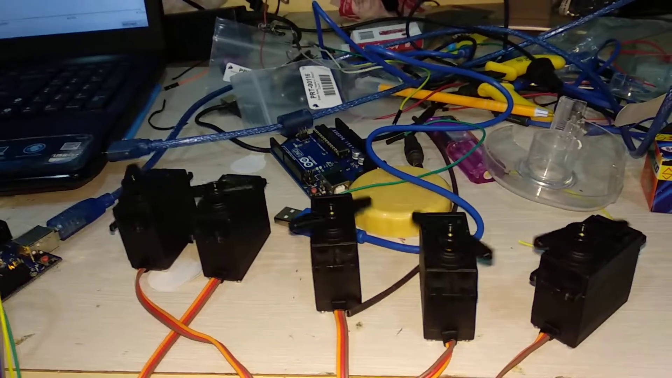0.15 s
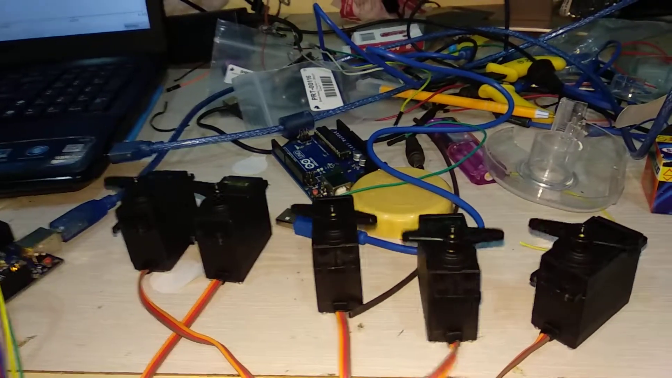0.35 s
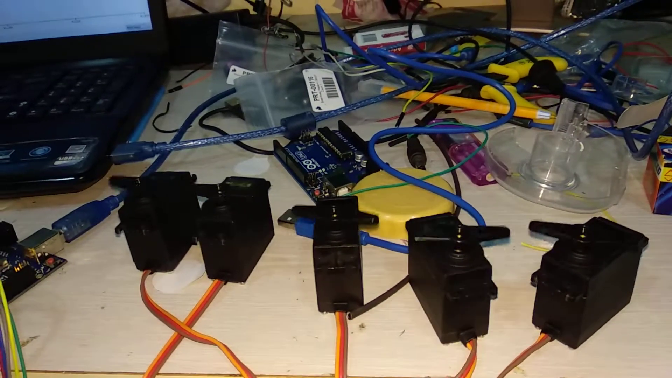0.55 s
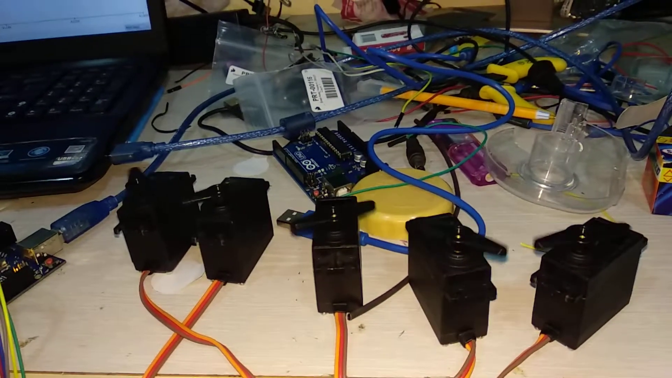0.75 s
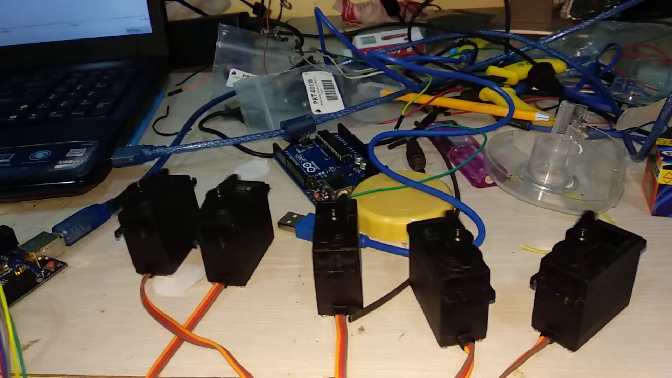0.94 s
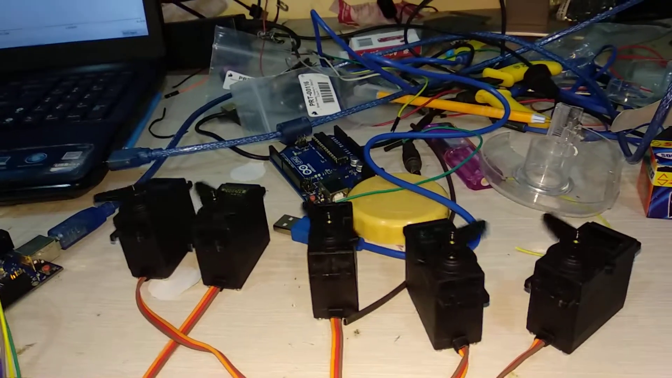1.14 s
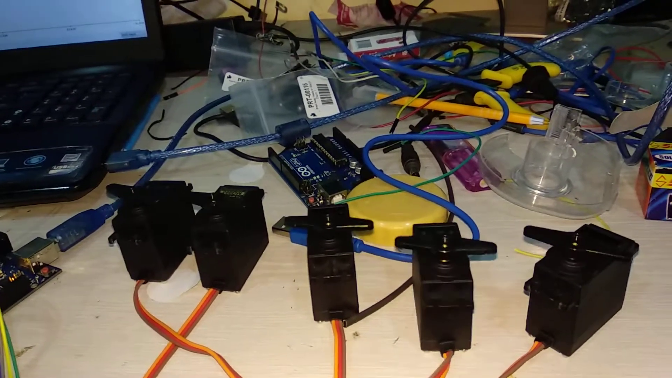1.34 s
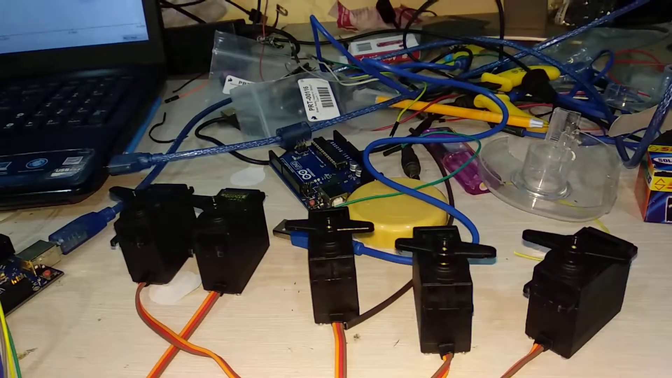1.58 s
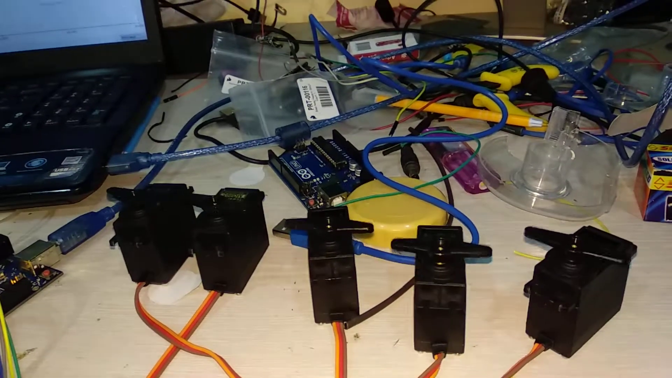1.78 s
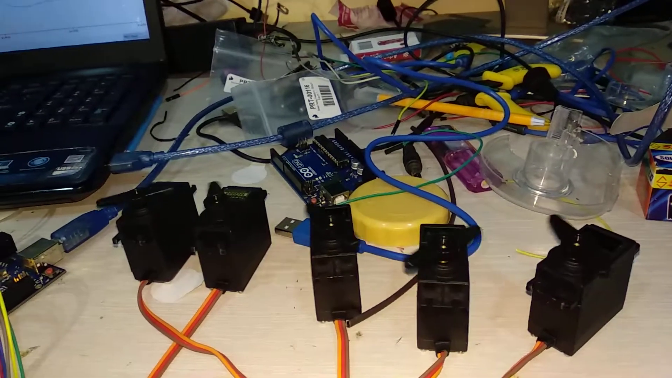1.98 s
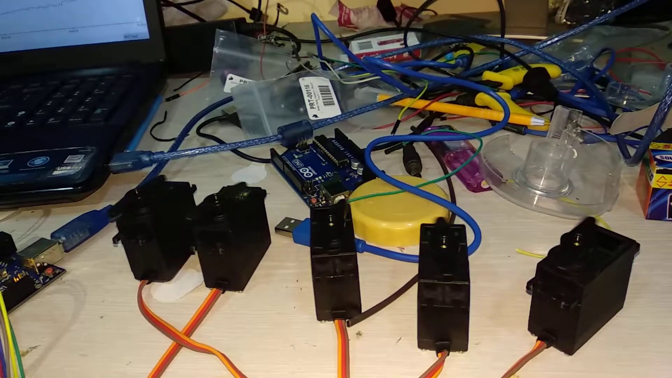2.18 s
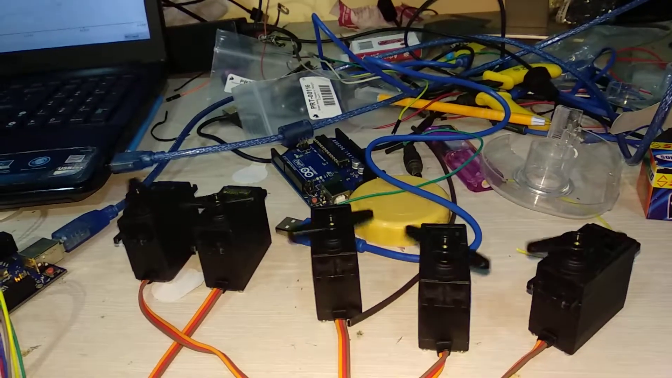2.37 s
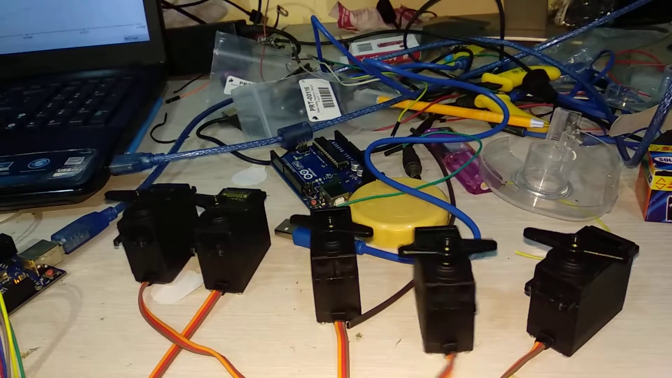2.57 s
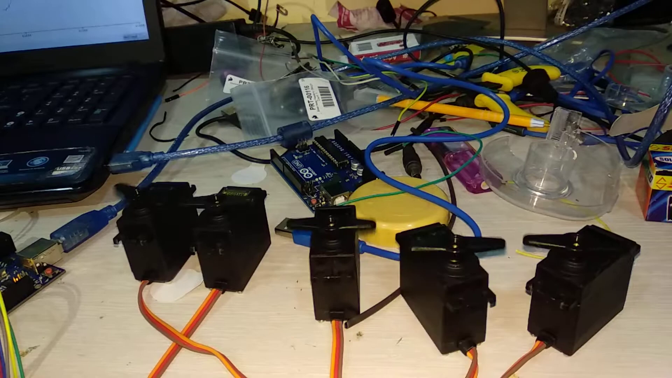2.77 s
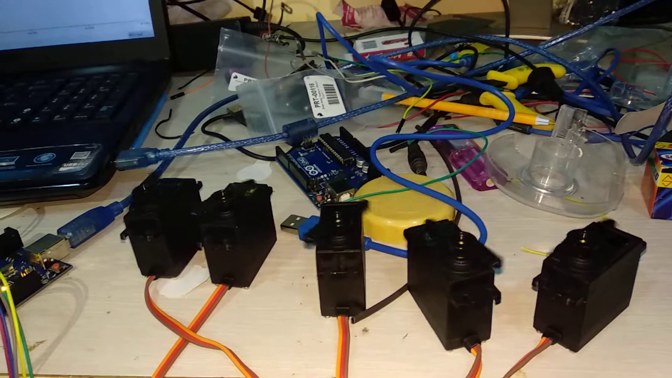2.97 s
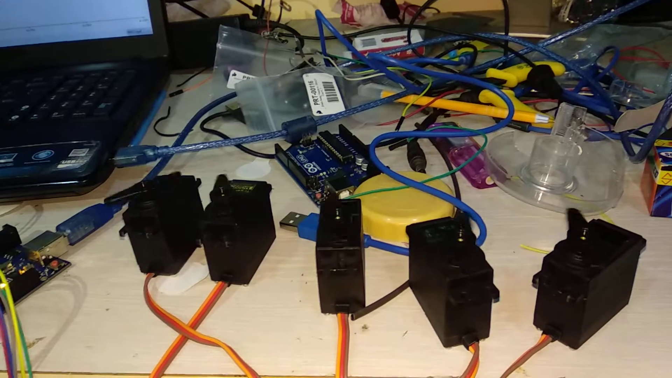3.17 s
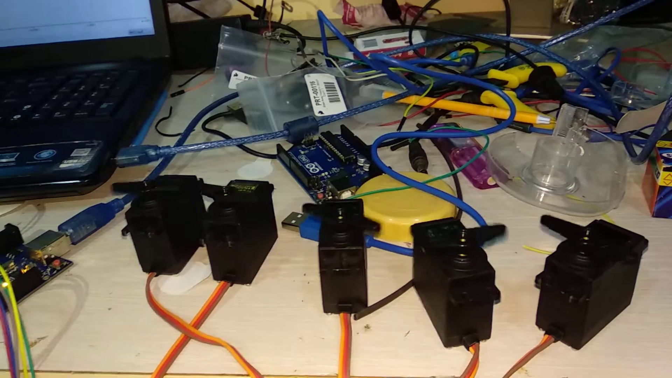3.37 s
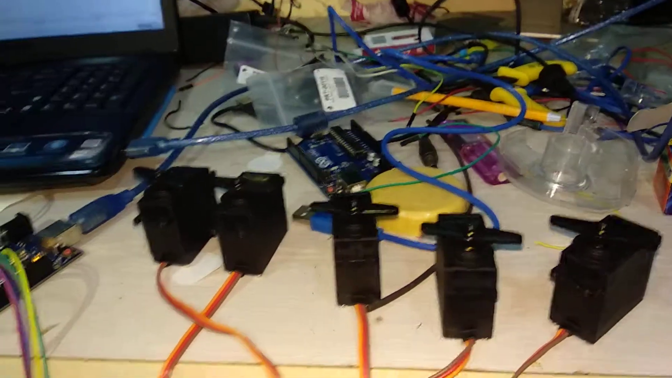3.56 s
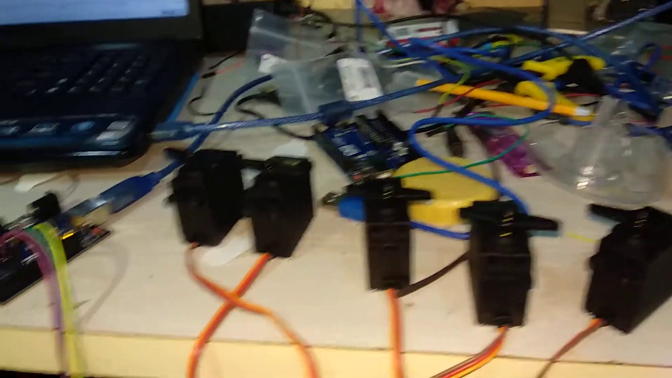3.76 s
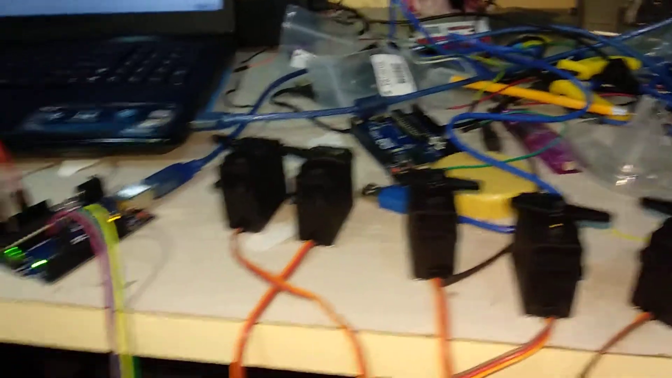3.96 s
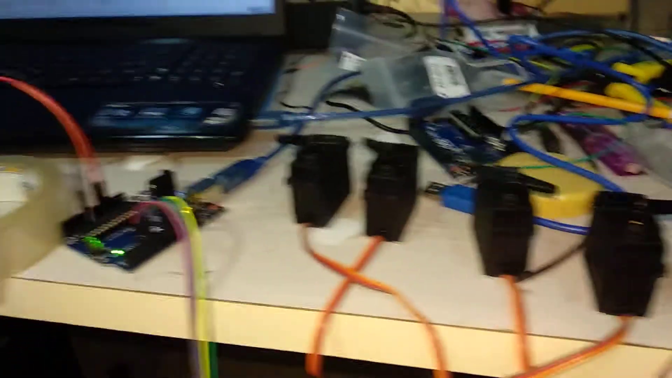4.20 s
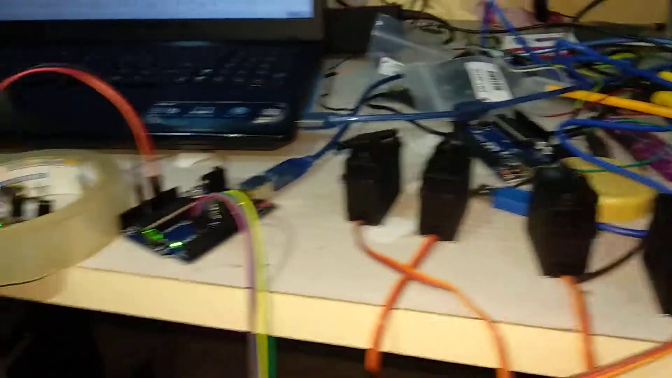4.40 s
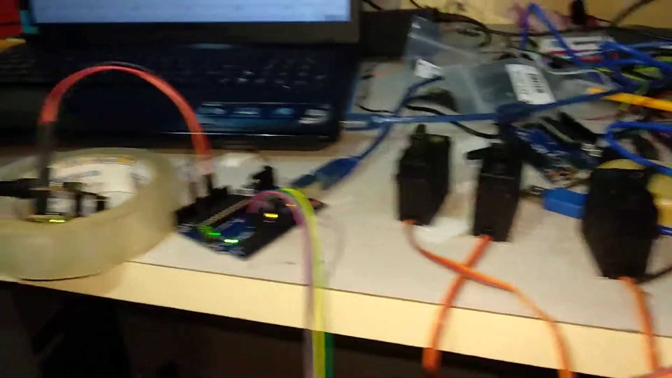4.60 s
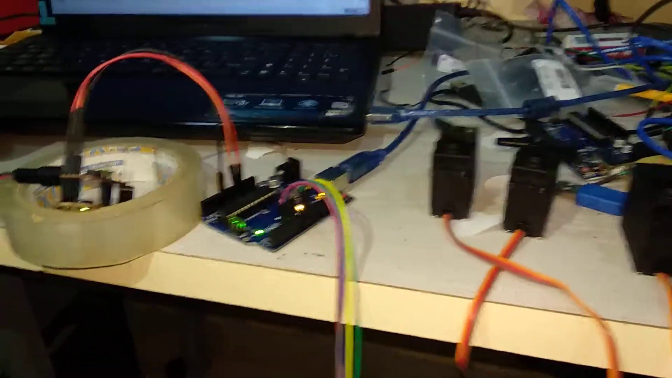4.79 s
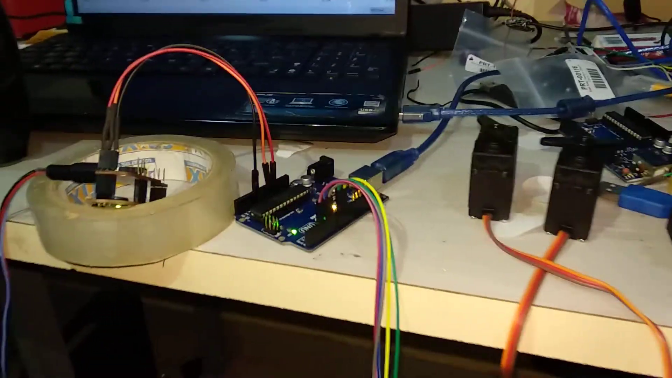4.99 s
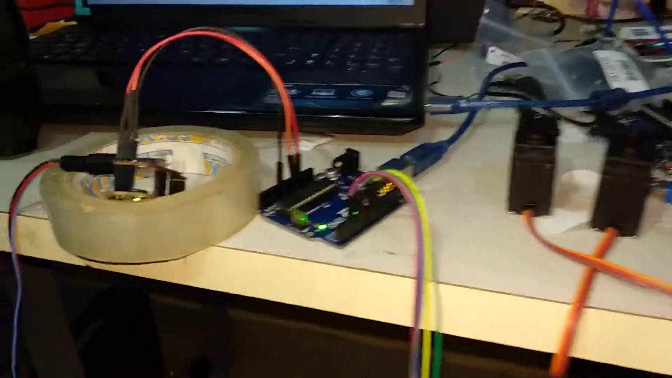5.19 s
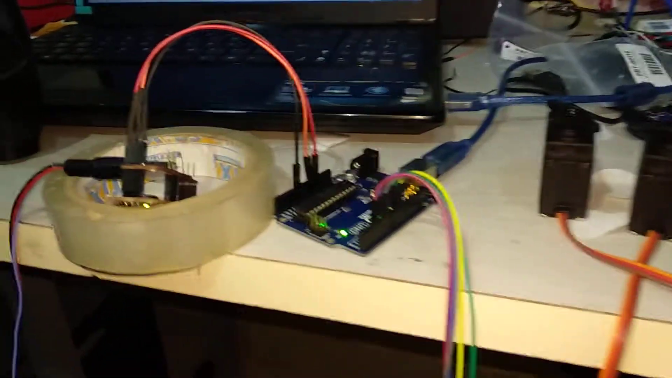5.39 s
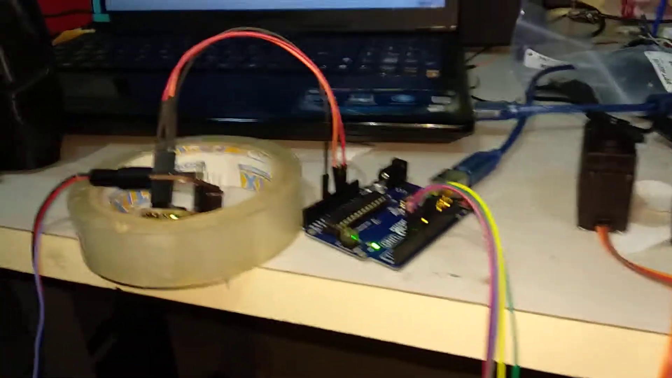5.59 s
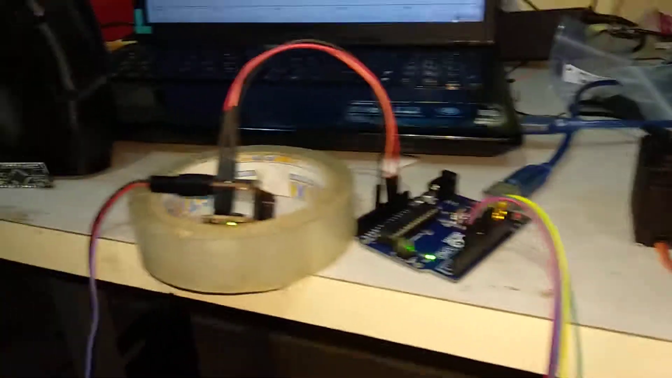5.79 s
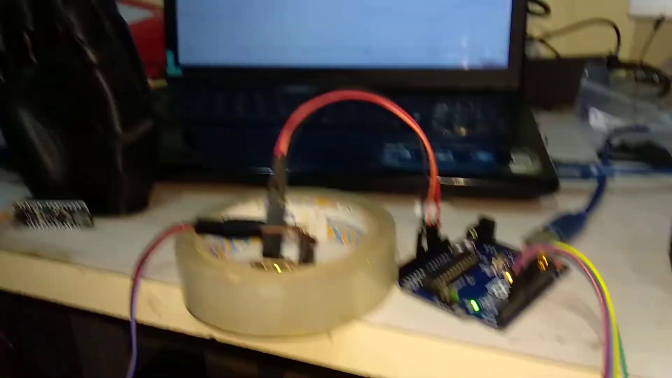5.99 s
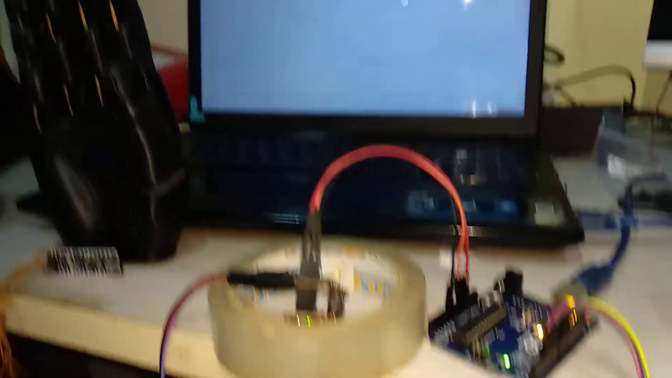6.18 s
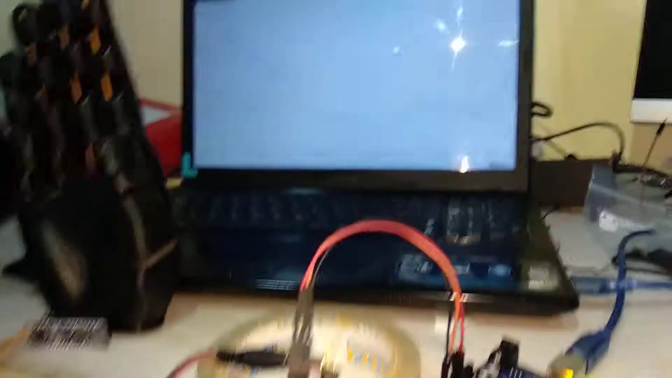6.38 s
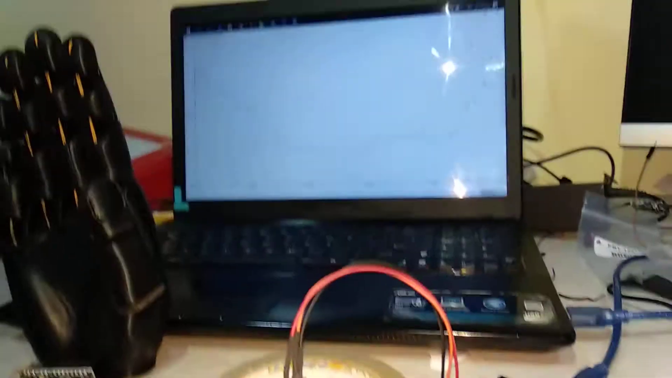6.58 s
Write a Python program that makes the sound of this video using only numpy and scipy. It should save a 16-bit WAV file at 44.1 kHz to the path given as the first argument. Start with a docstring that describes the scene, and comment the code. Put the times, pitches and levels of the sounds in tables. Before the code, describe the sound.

Small plastic-cased servos are heard close on a desk, strongly on the left, with only a faint wash on the right. A whir is already running at the start, gritty and rasping with low rotor hum and high brush fizz, slowing out by 0.45 s. A second swing, brighter, runs from about 0.5 to 1.4 s, with sharp tooth knocks around 0.75-0.95 and a strained growl near 1.0. After a short gap of ticking buzz, a third runs 1.7-2.6 s, and a fourth follows at once until 3.5, growling near 3.2. A quiet, rapid ticking buzz holds until 4.1, when a fifth, fizzier and more whining swing starts, knocks hard around 4.4 and cuts off near 4.75 with a brief coasting tail. The rest, to about 6.5 s, is steady electrical buzz, changing as the microphone nears the circuit board, with faint fan noise and soft hand bumps around 5.6 and 6.0.

```python
"""Five servos on a desk

Five hobby servos swing their arms to and fro, five moves in all, close to a phone used as microphone.
Each move is rotor hum on the desk, scrape and clack of gear teeth in plastic cases, brush fizz and whine.
At rest the servos tick and buzz in a repeating cycle, and the phone is carried nearer to the circuit board.
Air and fan noise and soft bumps of the hand lie beneath; servos reach the right channel as a faint wash."""
import sys
import numpy as np
from scipy import signal
from scipy.fft import rfft, irfft, next_fast_len
from scipy.io import wavfile
from scipy.ndimage import uniform_filter1d, map_coordinates

SR = 44100
rng = np.random.default_rng(int(sys.argv[2]) if len(sys.argv) > 2 else 0)


def int16_out(signal):
    """Quantize to a 16-bit WAV file."""
    q = np.round(np.clip(np.atleast_2d(signal).T, -1, 1) * 32767)
    wavfile.write(sys.argv[1], SR, q.astype(np.int16))


N = 293264
TIME = np.arange(N) / SR
FREQ = np.fft.rfftfreq(N, 1 / SR)


def amp(db):
    """Decibels to gain."""
    return 10 ** (np.asarray(db) / 20)


def evened(x):
    """Scales to rms 1."""
    return x / np.sqrt(np.mean(x ** 2) + 1e-20)


def steady(x, size=2000):
    """Holds the slow level of x at rms 1, averaging its power over size samples."""
    return x / np.sqrt(abs(uniform_filter1d(x ** 2, size)) + 1e-12)


def read(points, hz):
    """Reads a spectrum between its points on a log-frequency axis."""
    f, value = np.transpose(points)
    return np.interp(np.log(hz + 1), np.log(f + 1), value)


def follow(rows, t):
    """Reads each column of a curve at the times t."""
    s, *columns = np.transpose(rows)
    return [np.interp(t, s, c) for c in columns]


def add(mix, s, sound):
    """Mixes a sound in at s seconds."""
    part = mix[max(round(s * SR), 0):][:len(sound)]
    part += sound[:len(part)]


def wander(size, span):
    """Slow chance of rms 1, smooth over span seconds."""
    padded = next_fast_len(size)
    hz = np.fft.rfftfreq(padded, 1 / SR)
    slow = rfft(rng.standard_normal(padded)) / (1 + (hz * span) ** 4)
    return evened(irfft(slow, padded)[:size])


def ring(x, gain):
    """Passes x through a causal, minimum-phase body whose gain is given from 0 to SR / 2."""
    log_gain = np.log(np.maximum(np.r_[gain, gain[-2:0:-1]], 1e-5))
    response = np.fft.ifft(np.exp(np.conj(signal.hilbert(log_gain)))).real
    return signal.oaconvolve(x, response[:len(gain)])[:len(x)]


def pulse(t, rise):
    """A swell that peaks rise seconds in and dies away."""
    return (t / rise * np.exp(1 - t / rise)) ** 2


# colour of the room's air and fans: pitch_hz, relative level_db (per Hz)
ROOM_COLOUR = [(25, -16), (55, -21.5), (88, -2.5), (140, -8), (240, -13), (350, -6.5), (640, -11.5),
               (900, -12), (1600, -13), (2300, -15), (4400, -22.5), (9500, -22), (16000, -33.5)]
# how much weaker that noise is in the right channel: pitch_hz, drop_db
ROOM_RIGHT_DROP = [(60, 8.1), (110, 11), (200, 13.7), (380, 23.4), (700, 23), (1290, 26), (2380, 26.4),
                   (4400, 20.0), (8120, 23), (15000, 8.6)]


def room_noise(db=-49.0, right_db=0):
    """Steady air and fan noise all around, unrelated in the two channels; db is relative."""
    left, right = rfft(rng.standard_normal((2, N))) * amp(read(ROOM_COLOUR, FREQ))
    right = right * amp(right_db - read(ROOM_RIGHT_DROP, FREQ))
    pair = irfft(np.array([left, right]), N)
    return amp(db) * pair / pair[0].std()


# soft bumps of the hand on the phone: start_s, left level_db, right level_db, pitch_hz
HAND_BUMPS = [(1.74, -38, -58, 78), (2.474, -44, -54, 78), (3.144, -43, -44, 115), (3.731, -47, -41, 90),
              (5.545, -55, -46, 109), (5.615, -38.5, -55, 78), (5.997, -40, -35, 90)]


def bumps():
    """Dull, quickly dying thuds through the phone's body: a low tone roughened by slow noise."""
    out, t = np.zeros((2, N)), TIME[:6000]
    rise_s, grit = .013, .2
    for s, left_db, right_db, hz in HAND_BUMPS:
        for channel, db in zip(out, (left_db, right_db)):
            thud = np.sin(2 * np.pi * (hz * t + rng.random()))
            thud += grit * wander(len(t), .5 / hz)
            add(channel, s, amp(db) * thud * pulse(t, rise_s))
    return out


HOLD_CYCLE_S = .06  # three control frames


def nudges(rows):
    """Each correction jerks a motor, and its case rings briefly; the same pattern comes round every cycle."""
    out, t, uneven = np.zeros(N), TIME[:1000], .08
    for s, db, hz, rise_s in rows:
        tick = amp(db) * np.sin(2 * np.pi * hz * t) * pulse(t, rise_s)
        for start in np.arange(s, TIME[-1], HOLD_CYCLE_S):
            add(out, start, tick * (1 + uneven * rng.standard_normal()))
    return out


# holding corrections from across the desk: start_s (within a cycle), relative level_db, pitch_hz, rise_s
NUDGES_ACROSS_DESK = [(.001, -44, 325, .003), (.007, -45.5, 665, .0026), (.018, -51, 660, .0025),
                      (.032, -52, 315, .004), (.055, -45, 430, .0016), (.0565, -45.5, 670, .0022)]
# the same columns, with the phone near the circuit board
NUDGES_AT_BOARD = [(.005, -51, 320, .003), (.019, -52, 600, .002), (.048, -52, 620, .0018),
                   (.0558, -45.5, 460, .0016), (.0567, -40.8, 665, .002), (.0572, -50, 1300, .0006)]
# steady hum and buzz: pitch_hz, relative level_db across the desk, relative level_db near the board
HOLDING_HUM = [(199.8, -71, -64), (299.8, -66, -71), (316.7, -69, -66), (333.1, -66, -72),
               (399.7, -60, -53.5), (433, -73, -66), (466.3, -68, -80), (499.7, -70, -56.5),
               (650, -63.5, -77), (666.2, -66, -70)]
# the phone's approach to the circuit board: time_s, nearness (0-1)
BOARD_NEARNESS = [(3.9, 0), (4.8, 0.31), (5.5, 0.87), (6.1, 0.95)]


def holding():
    """Servos at rest tick in step with the control frames over steady tones; nearness blends two balances."""
    near = np.clip(follow(BOARD_NEARNESS, TIME)[0], 0, 1)
    ticks = (1 - near) * nudges(NUDGES_ACROSS_DESK) + near * nudges(NUDGES_AT_BOARD)
    tones = np.zeros(N)
    for hz, far_db, close_db in HOLDING_HUM:
        level = amp(far_db) * (1 - near) + amp(close_db) * near
        tones += level * np.cos(2 * np.pi * (hz * TIME + rng.random()))
    return ticks + np.sqrt(2) * tones


def desk_echo(x, t60=0.18):
    """Desk clutter and the small room return a short tail of scattered, dying reflections."""
    t = TIME[:12000]
    struck = rng.random(len(t)) < 2000 / SR  # about 2000 reflections a second
    taps = rng.standard_normal(len(t)) * struck * amp(-60 * t / t60) * (t > .002)
    return signal.oaconvolve(x, taps / np.linalg.norm(taps))[:N]


DRIFT, DRIFT_S = .002, .2  # share of the speed, and the time it takes


def speeds(t, curve):
    """Turns per second of the humming and the worn motor: inertia rounds changes, uneven friction drifts."""
    inertia = 1500  # samples
    return [uniform_filter1d(hz, inertia, mode="nearest") * (1 + DRIFT * wander(len(t), DRIFT_S))
            for hz in follow(curve, t)]


COAST_S, COAST_DB_PER_S = .3, 60  # the coasting tail: its length and basic fade
# the ranges case, gears, brushes: attack (multiple of the swing's), steepness of the fade when braking
RANGE_RESPONSE = [(.4, 0.66), (.9, 0.95), (1.3, 1.05)]


def running(t, start, stop, jolt, attack, braking, coast_db):
    """Gain of each range: a jolt, a rise, a rounded fall under braking; the slowest servo coasts out."""
    braked = 1 - np.clip(1 - (stop - t) / braking, 0, 1) ** 2
    since_stop = np.clip(t - stop, 0, COAST_S)
    coasting = amp(coast_db - COAST_DB_PER_S * since_stop) * (1 - (since_stop / COAST_S) ** 3)
    gains = []
    for lag, steepness in RANGE_RESPONSE:
        rising = 1 - (1 - jolt) * np.exp(-(t - start) / (attack * lag))
        gains.append(rising * np.maximum(braked ** steepness, coasting))
    return np.array(gains)


LOOSE, TIGHT = .72, .16  # clacking share (0-1) with loose teeth, and with teeth pressed tight
LOOSEN_S, KNOCK_POWER = .24, 3  # time to work loose; slow teeth knock less, by this power of speed
STRAIN_RISE_S = 0.21
# late in a swing back the gears come under load and growl: middle of the rise_s,
# then the change of case drone_db, gear teeth_db, brush fizz_db
GEAR_STRAINS = [(1.033, 2.2, -0.2, -5), (3.232, 4, -2.5, 7)]


def load(t, start, stop, speed):
    """Teeth work loose until a strain presses them tight: the clacking share and the gain of each range."""
    slack = (1 - np.exp(-(t - start) / LOOSEN_S)) * speed ** KNOCK_POWER
    lift_db = 0
    for s, *range_db in GEAR_STRAINS:
        if start < s < stop:
            strain = np.clip(.5 + (t - s) / STRAIN_RISE_S, 0, 1)
            slack = slack * (1 - strain)
            lift_db = np.outer(range_db, strain)
    return TIGHT + (LOOSE - TIGHT) * slack, amp(lift_db)


# how the desk passes on the hum of a rotor: pitch_hz, gain_db
DESK_RESPONSE = [(165, -30), (186, -14), (215, -24), (260, -17), (320, -9.5), (343, -13), (358, -4),
                 (372, -.5), (420, -14), (540, -25), (620, -20), (665, -13), (712, -13), (738, -15),
                 (800, -28)]


def hum(rotor_hz, levels_db):
    """Imbalance pulls once a turn, magnets twice and four times; each order swells at desk resonances."""
    turns, waver_db, waver_s = np.cumsum(rotor_hz) / SR, 1, .07
    out = np.zeros(len(turns))
    for order, db in zip((1, 2, 4), levels_db):
        level_db = db + read(DESK_RESPONSE, order * rotor_hz) + waver_db * wander(len(turns), waver_s)
        out += amp(level_db) * np.cos(2 * np.pi * order * turns)
    return np.sqrt(2) * out


def mesh(turns, others_db=-5):
    """Teeth of several gear trains scrape; the scraping partly repeats with every turn."""
    patterns, repeat = rng.standard_normal((3, 256)), .27  # share of the power that repeats
    trains = [(1, 0), (.955, others_db), (1.04, others_db)]  # speed ratio, level dB
    cyclic = np.zeros(len(turns))
    for pattern, (ratio, db) in zip(patterns, trains):
        place = turns * ratio % 1 * len(pattern)
        cyclic += amp(db) * map_coordinates(pattern, [place], order=3, mode="grid-wrap")
    fresh = rng.standard_normal(len(turns))
    return evened(np.sqrt(repeat) * evened(cyclic) + np.sqrt(1 - repeat) * fresh)


def clacks(turns, other_turns):
    """The worn tooth knocks once a turn, graze to full blow, and bounces; other gear trains knock between."""
    out = np.zeros(len(turns))
    graze, chatter_db, slip, stray_db = 1.1, -14, .04, -4.5  # slip in turns
    for train, db in [(turns, 0), (.97 * other_turns, stray_db), (1.06 * other_turns, stray_db)]:
        size, late = rng.random(256) ** graze, rng.standard_normal(256)
        blow = np.arange(256) + slip * late
        bounce = blow + rng.uniform(.06, .25, 256)
        rebound = size * rng.uniform(0, .7, 256)
        at = np.searchsorted(train, np.r_[blow, bounce])
        inside = (at > 0) & (at < len(turns))
        out[at[inside]] += amp(db) * np.r_[size, rebound][inside]
    # the tooth chatters for a moment as it slides into and out of contact
    rattle = signal.oaconvolve(out, np.hanning(45), "same")
    return out + amp(chatter_db) * rattle * rng.standard_normal(len(out))


# the hardest knocks of the gear teeth: start_s, relative level_db (of the peak)
TOOTH_SLAMS = [(0.757, -19), (.882, -19), (0.893, -18), (.95, -16), (1.72, -26), (2.278, -22), (2.36, -22),
               (4.254, -22), (4.393, -17), (4.42, -18)]


def hard_knocks(t, body):
    """Now and then a tooth slams across its whole play and rings the gearbox."""
    out, knock = np.zeros(len(t)), ring(signal.unit_impulse(len(body)), body)
    for s, db in TOOTH_SLAMS:
        if t[0] < s < t[-1] - COAST_S:
            add(out, s - t[0], amp(db) * knock / abs(knock).max())
    return out


# colour of the brush whine: pitch_hz, relative level_db
WHINE_COLOUR = [(5500, -13), (9000, -13), (10300, -6), (11200, -4), (11700, .5), (12300, -1.5), (12800, -9),
                (13200, -28), (16000, -24)]


def whine(commutator_hz):
    """Brushes snap over the commutator gaps: gliding high lines, with weaker rotor orders between."""
    waver, between_db, uneven_db = .0006, -7, 2.2
    hz = commutator_hz * (1 + waver * wander(len(commutator_hz), 0.03))
    phase = 2 * np.pi * np.cumsum(hz) / SR
    orders = np.arange(39, 78) / 3  # thirds fall on the rotor's own orders
    levels_db = uneven_db * rng.standard_normal(len(orders)) + between_db * (orders % 1 > 0)
    lines = np.zeros(len(hz))
    for k, db in zip(orders, levels_db):
        lines += amp(read(WHINE_COLOUR, k * hz) + db) * np.cos(k * phase + 2 * np.pi * rng.random())
    return evened(lines)


# ringing and dead spots of the plastic cases, and a narrow notch near 4.6 kHz from a desk reflection: pitch_hz,
# width_hz, lift_db
CASE_RESONANCES = [(2130, 65, 2), (2810, 120, 1), (3490, 250, 1.5), (4430, 240, 5.5), (4580, 110, -10),
                   (6160, 580, 6), (7270, 160, 3.5), (11700, 330, -1), (12050, 280, -4.5),
                   (13800, 790, -8.5)]


def case_gain(hz, colour):
    """A plastic case lifts and swallows narrow bands of the gearbox's broad colour; a desk reflection cuts a
    narrow notch."""
    modes_db = sum(db / (1 + (2 * (hz - f) / w) ** 2) for f, w, db in CASE_RESONANCES)
    return amp(read(colour, hz) + modes_db)


# where a knocked gear tooth rings: pitch_hz, width_hz
TOOTH_RESONANCES = [(2800, 1420), (7700, 2800)]


def tooth_gain(hz):
    """A struck tooth rings in a few broad bands."""
    return np.sqrt(sum(1 / (1 + (2 * (hz - f) / w) ** 4) for f, w in TOOTH_RESONANCES))


ROTOR_HZ = 191  # reference for full rotor speed, turns per second
GAPS_PER_TURN = 3  # commutator gaps
WHINE_FALL_DB = 31  # drop in whine drive from full speed to standstill
# how deeply the worn gear's stroke, once a turn, swells each range: depth (0-1) for case, gears, brushes
STROKE_DEPTH = [.1, .2, .07]


def move(row, colour, curve, hum_db, case_clack=0.63, fizz_clack=.15, others_db=-5):
    """One swing: scraping and clacks sound through case, gears and brushes, over the hum of the rotors."""
    start, length, jolt, attack, braking, case_db, gear_db, fizz_db, coast_db, whine_db = row
    stop = start + length
    t = TIME[max(round(start * SR), 0):round((stop + COAST_S) * SR)]
    rotor_hz, worn_hz = speeds(t, curve)
    turns, speed = np.cumsum(worn_hz) / SR, worn_hz / ROTOR_HZ
    loose, strained = load(t, start, stop, speed)
    gains = running(t, start, stop, jolt, attack, braking, coast_db)
    stroke = 1 + np.outer(STROKE_DEPTH, np.cos(2 * np.pi * turns))
    case, gears, fizz = gains * strained * stroke

    hz = np.fft.rfftfreq(2048, 1 / SR)
    body, tooth = case_gain(hz, colour), tooth_gain(hz)
    scrape = mesh(turns)
    knocks = ring(steady(clacks(turns, np.cumsum(rotor_hz) / SR)), tooth)
    # power shares above the two borders between case, gears and brushes
    over_case = 1 - 1 / (1 + (hz / 4600) ** 24)
    over_gears = 1 - 1 / (1 + (hz / 9600) ** 24)

    def part(power, clack):
        """One range of the body, driven by its own blend of scrape and knock."""
        share = np.clip(clack, 0, 1)
        drive = np.sqrt(1 - share) * scrape + np.sqrt(share) * knocks
        return steady(ring(drive, body * np.sqrt(power)))

    # the brushes sing mainly near full speed
    singing = amp(whine_db - WHINE_FALL_DB * (1 - speed))
    lines = evened(whine(GAPS_PER_TURN * worn_hz) + amp(others_db) * whine(GAPS_PER_TURN * rotor_hz))
    brushes = part(over_gears, fizz_clack * loose) + singing * lines
    brushes = brushes / np.hypot(1, singing)
    sound = amp(case_db) * case * part(1 - over_case, case_clack * loose)
    sound += amp(gear_db) * gears * part(over_case - over_gears, loose)
    sound += amp(fizz_db) * fizz * brushes
    sound += hum(rotor_hz, hum_db) * gains[0]
    sound += hard_knocks(t, body * tooth)
    return t[0], sound * signal.windows.tukey(len(t), .005)


# swings of the arms: start_s, length_s, first jolt (0-1), attack_s, braking_s,
# relative levels: case drone_db, gear teeth_db, brush fizz_db; coasting_db, whine against fizz_db
SWINGS = [(-.5, 0.95, .1, .05, .2, -35.5, -31.5, -34, -17.5, -9),
          (.478, .92, 0, 0.11, 0.19, -34.5, -30.5, -33.5, -21.5, -14),
          (1.717, 0.91, 0.04, 0.05, .24, -35, -31.5, -33, -21.5, -7),
          (2.638, .9, .11, 0.11, 0.19, -35, -31.5, -35.5, -23, -9),
          (4.072, .68, 0, .05, 0.031, -34, -29.5, -25.5, -10.5, -2.5)]
# colour of the gearboxes, turning one way: pitch_hz, relative level_db (per Hz)
COLOUR_FORTH = [(470, -49), (800, -17), (1260, -2), (1460, -3.5), (1830, 1), (2800, 7), (4570, -5),
                (6170, -3.5), (7360, -0.5), (8880, -2), (11800, -4), (12600, -9), (13250, -30),
                (13900, -10), (15800, -18)]
# the same columns, turning back
COLOUR_BACK = [(470, -48), (800, -13.5), (1030, -14), (1270, -3.5), (1420, -9), (1850, 2.5), (2350, 3),
               (2800, 9), (4510, -9), (6170, -5.5), (7170, -2), (8550, -7.5), (11400, 9.5), (13400, 5),
               (16000, 8)]
# the same columns, from close by
COLOUR_CLOSE = [(470, -48), (800, -16.5), (1020, -18.5), (2020, -7), (2320, -9.5), (2600, -5), (3510, -5),
                (4460, -6.5), (5510, -16), (6330, -16.5), (8340, -8), (9450, -6.5), (11800, 5),
                (13900, -7.5), (16000, -13)]
# rotor speeds through each swing: time_s, humming motor (turns per second), worn motor (turns per second)
ROTOR_SPEEDS = [
    [(-.3, 175, 176), (0, 186, 190), (.14, 186, 191), (.27, 178, 188), (.36, 162, 172), (.46, 125, 130)],
    [(.478, 95, 100), (.62, 160, 166), (.7, 180, 183), (.8, 186, 191), (.95, 188.5, 194), (1.1, 186, 188),
     (1.21, 184, 177), (1.3, 166, 160), (1.4, 125, 125)],
    [(1.716, 95, 107), (1.86, 163, 166), (1.95, 179, 180), (2.05, 184, 186), (2.2, 185, 190),
     (2.32, 184, 193), (2.43, 180, 186), (2.53, 164, 168), (2.636, 120, 125)],
    [(2.638, 95, 100), (2.78, 160, 163), (2.86, 179, 184), (2.95, 185, 193), (3.1, 188.5, 195),
     (3.25, 186, 190), (3.37, 183, 178), (3.45, 165, 160), (3.54, 125, 125)],
    [(4.072, 70, 107), (4.16, 130, 156), (4.205, 161, 168), (4.26, 174, 177), (4.34, 181, 185),
     (4.48, 185, 186.5), (4.6, 186, 194), (4.73, 181, 194.5), (4.8, 170, 170)],
]
# hum of each swing: relative level_db once a turn, twice a turn, four times a turn
HUM_LEVELS = [(-48, -47, -45), (-47, -49.3, -51), (-47.5, -47, -45.5), (-46, -49.3, -51), (-51, -48, -42.5)]


def servos():
    """The five swings in turn: forth, back, forth, back, and the last heard from close by."""
    out = np.zeros(N)
    colours = (COLOUR_FORTH, COLOUR_BACK, COLOUR_FORTH, COLOUR_BACK, COLOUR_CLOSE)
    for swing in zip(SWINGS, colours, ROTOR_SPEEDS, HUM_LEVELS):
        add(out, *move(*swing))
    return out


def scene(left_db=5.5, right_db=-34, wet_db=-12):
    """The servos reach the left channel almost alone; the right holds only a faint wash of them."""
    swings = servos()
    left = swings + amp(wet_db) * desk_echo(swings) + holding()
    right = desk_echo(left, t60=0.17)
    desk = np.array([amp(left_db) * left, amp(right_db) * right])
    return desk + amp(left_db) * room_noise() + bumps()


EDGE_HZ = 15850  # upper band limit


def record(dry, low_cut_hz=60):
    """The microphone's bass cut and the band limit."""
    bass_cut = signal.butter(2, low_cut_hz, "highpass", fs=SR, output="sos")
    thin = signal.sosfilt(bass_cut, dry)
    band_limit = signal.firwin(601, EDGE_HZ, window=("kaiser", 9), fs=SR)
    return signal.oaconvolve(thin, band_limit[None], "same")


dry = scene()
out = record(dry)
int16_out(out)
```